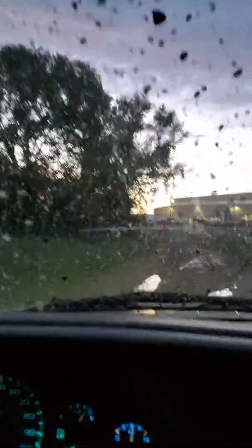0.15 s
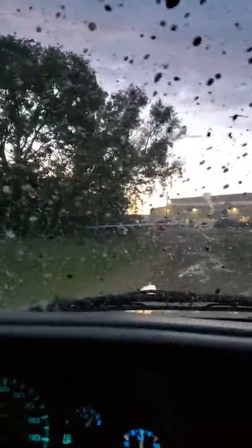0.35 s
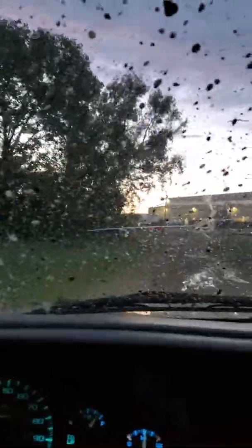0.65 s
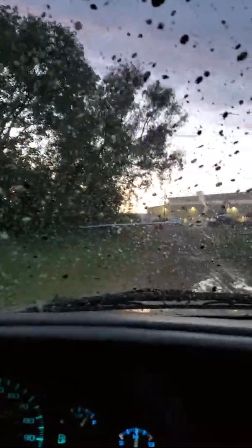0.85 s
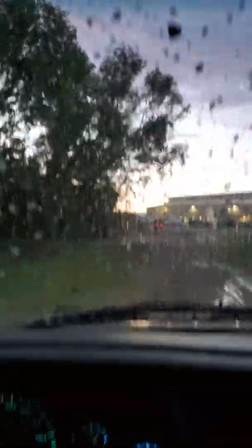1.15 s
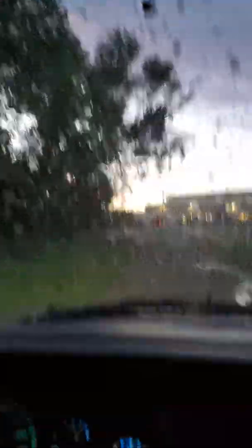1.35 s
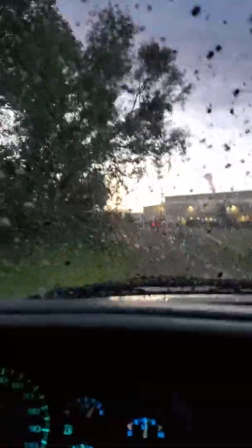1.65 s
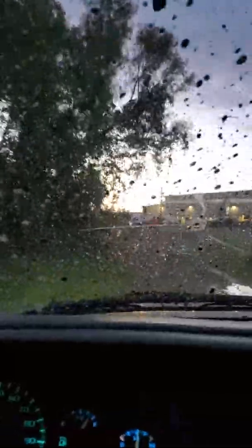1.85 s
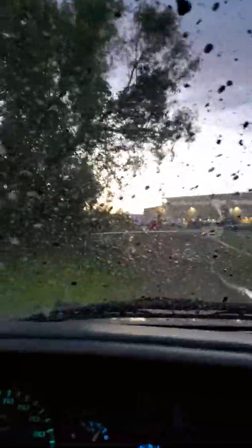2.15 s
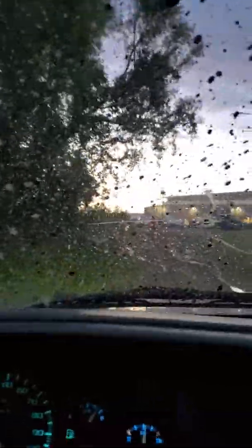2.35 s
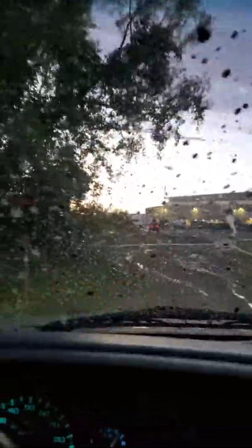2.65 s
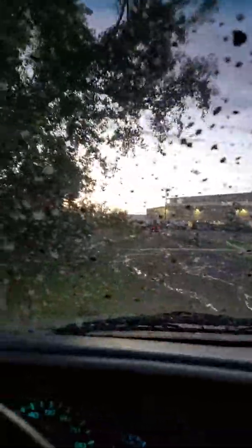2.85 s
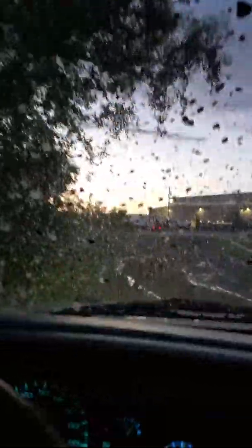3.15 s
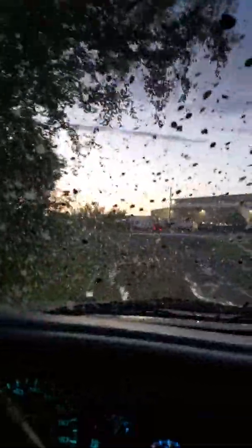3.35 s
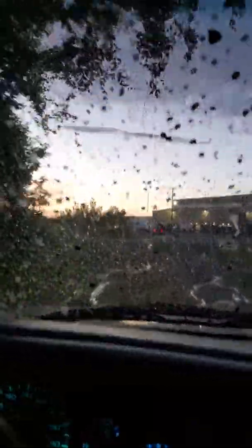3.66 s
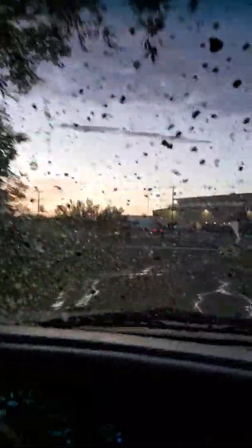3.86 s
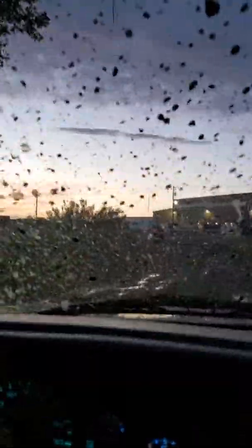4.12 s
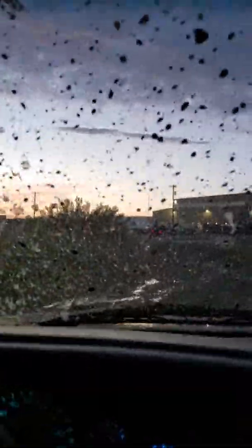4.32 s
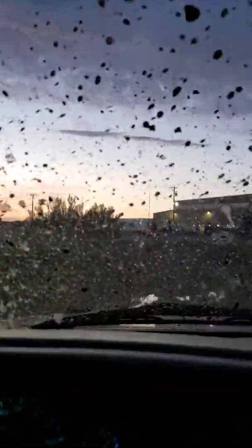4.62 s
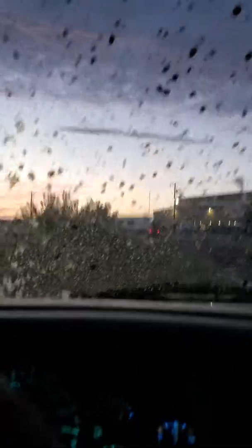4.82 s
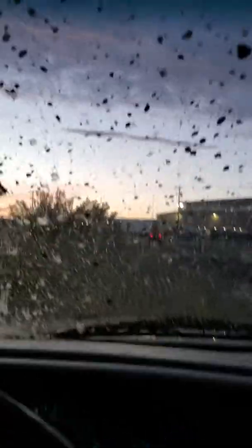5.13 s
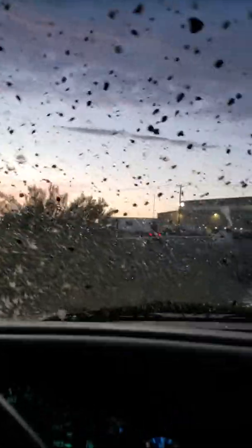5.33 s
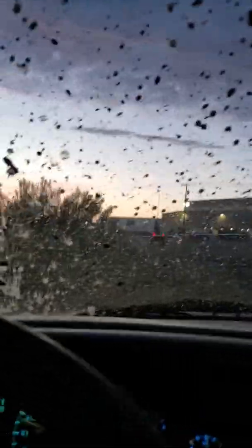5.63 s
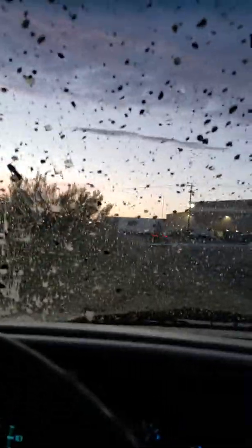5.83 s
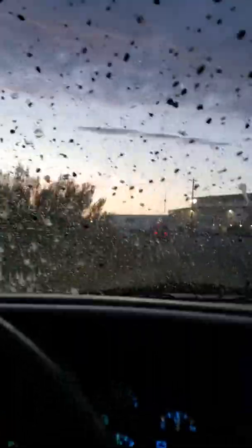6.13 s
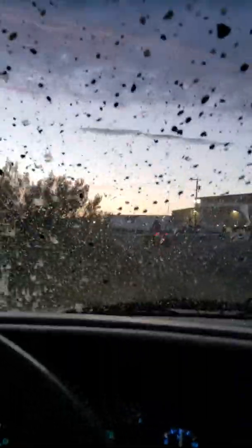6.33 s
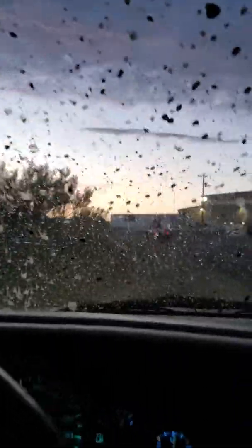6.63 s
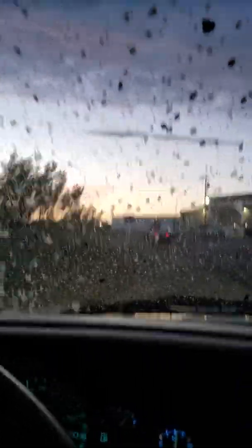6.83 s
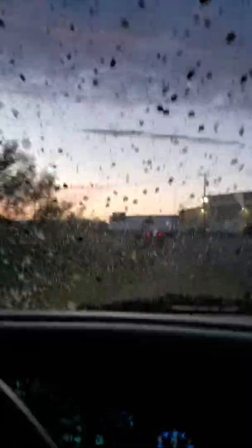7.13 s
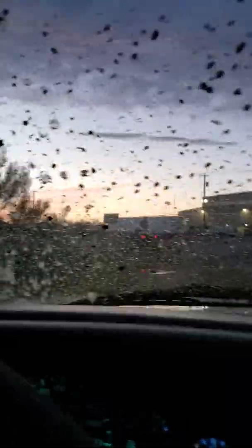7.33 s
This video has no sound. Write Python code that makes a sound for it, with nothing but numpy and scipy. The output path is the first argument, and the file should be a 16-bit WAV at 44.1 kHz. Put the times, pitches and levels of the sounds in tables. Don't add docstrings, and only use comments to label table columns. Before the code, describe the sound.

Inside a large vehicle's cab, a low engine drone sinks and fades while loose trim knocks, the body booms, and two hard jolts rattle everything late.

```python
import sys
import numpy as np
from scipy import signal
from scipy.fft import rfft, irfft, next_fast_len
from scipy.io import wavfile
from scipy.ndimage import uniform_filter1d, map_coordinates

SR = 44100
rng = np.random.default_rng(int(sys.argv[2]) if len(sys.argv) > 2 else 0)


def natural_amplitude(level_db):
    exponent = np.asarray(level_db, float) / 20
    return 10 ** exponent


def to_wav(sig):
    pcm = np.clip(np.atleast_2d(sig), -1, 1) * 32767
    pcm = np.round(pcm).astype(np.int16)
    wavfile.write(sys.argv[1], SR, pcm.T)


N = 329868

# time in seconds, firing rate in Hz, level in dB.
FIRING = [(0.0, 109.3, -15), (0.59, 108.6, -17), (1.03, 99.4, -19.5), (1.42, 87.2, -21.5),
          (1.87, 84.3, -19), (2.29, 72.45, -21), (2.6, 71.6, -21), (2.93, 71.78, -22.5), (3.3, 71.7, -19),
          (3.6, 71.7, -23), (3.9, 71.75, -19.5), (4.18, 65.86, -29.5), (4.46, 61.25, -27.5),
          (4.77, 54.04, -25), (5.02, 50.25, -27), (5.44, 51.37, -32), (5.6, 51.06, -19)]
# multiple of the firing rate, level in dB relative to it.
ENGINE_ORDERS = [(.5, -16.5), (1.37, -29.5), (2, -36)]
# time in seconds, pitch in Hz, level in dB.
DRIVELINE = [(0, 68.68, -20), (.7, 67.76, -31), (1.499, 54.53, -22), (2.2, 49.15, -37), (2.6, 43.8, -29.5),
             (2.9, 46.84, -23), (3.15, 48.4, -47), (3.4, 46.52, -23.5), (3.6, 45.72, -16.5),
             (3.78, 46.7, -30), (3.95, 48.2, -22), (4.13, 48, -24.5), (4.35, 47.95, -23.5)]
# time in seconds, pitch in Hz, level in dB.
AXLE_SHUDDER = [
    (0, 29.96, -38),
    (1, 30.34, -36.5),
    (2.5, 27.22, -44),
    (3.3, 29, -29),
    (4.2, 30.1, -52),
]


def engine():
    floor_hz, floor_width_hz, floor_lift_db = 162, 22, 18
    phase, gain = hum(FIRING, drift=0.003, flutter_db=0.8)
    firing_hz = np.gradient(phase) * SR / (2 * np.pi)
    out = -gain * np.cos(phase)
    for multiple, under_db in ENGINE_ORDERS:
        lift_db = floor_lift_db / (1 + ((multiple * firing_hz - floor_hz) / floor_width_hz) ** 2)
        unsteady_db = 1.5 * wobble(4.6)
        out = out + gain * natural_amplitude(under_db + lift_db + unsteady_db) * np.sin(multiple * phase)
    for rows in (DRIVELINE, AXLE_SHUDDER):
        phase, gain = hum(rows, drift=0.01, flutter_db=1.5)
        out = out + gain * np.sin(phase)
    return out


def hum(rows, drift, flutter_db):
    last_s, last_hz, _ = rows[-1]
    hz, db = curves(rows + [(last_s + 1.4, last_hz, -60)])
    phase = 2 * np.pi * np.cumsum(hz * (1 + drift * wobble(8))) / SR
    return phase, np.sqrt(2) * natural_amplitude(db + flutter_db * wobble(6))


# time in seconds, dB over a smooth crawl.
SHAKING = [(0.4, -0.5), (1.3, 5), (1.9, 3), (2.4, 2.5), (3.8, 0), (3.98, 4), (4.2, 10.5), (4.75, 2),
           (5.3, 2), (5.84, 10.5), (5.98, 22), (6.17, 21.5), (6.34, 13.5), (6.46, 24), (6.69, 3.5),
           (6.8, 5.5), (6.92, -2), (7.46, 0)]
# peak in seconds, lift in dB, rise in seconds, fall in seconds.
BUMPS = [(.3, -0.5, 0.89, 0.55), (1.7, -5.5, 0.43, .2), (2.91, 0, 1, .15), (3.55, 5, 1, 0.62),
         (4.09, 4.5, 0.34, 0.28), (4.5, -0.5, 0.17, 0.42), (5.19, 3, 0.079, 0.096),
         (5.59, 3.5, 0.33, 0.085), (5.8, -2, 0.0999, 0.12), (6.05, 13, 0.5, 0.16), (6.45, 13, 0.031, 0.12),
         (6.89, 3, 0.13, 0.029), (7.02, 7, 0.067, 0.22), (7.43, 12, 0.014, 0.043)]
# peak in seconds, lift in dB, rise in seconds, fall in seconds.
MUD_SLAPS = [(.25, 0.5, 0.37, 0.41), (1.44, 4, 0.12, 0.038), (1.62, 6.5, 0.11, 0.072),
             (3.83, 4, 0.086, 0.12), (4.58, -3, 0.081, 0.079), (4.65, 0.5, 0.018, 0.044),
             (4.94, 2.5, 0.39, 0.053), (5.41, 3, 0.18, 0.041), (5.71, 6, 0.19, 0.011),
             (6.47, -4, .03, 0.022), (6.9, -7, 0.056, 0.067), (7.29, 5, 0.11, 0.031), (7.42, -6, .04, 0.04)]
# frequency in Hz, density in dB per Hz.
BOOM = [(7.1, -36), (12, -21), (38, 3), (59, 6.5), (83, -0.5), (110, -7.5), (140, -35.5), (240, -120)]
# frequency in Hz, density in dB per Hz.
THRUM = [(59, -15.5), (100, 1), (151, 0), (194, -13), (230, -16), (300, -29), (510, -120)]
# frequency in Hz, density in dB per Hz.
DRUM = [(120, -21), (200, -1.5), (346, -5), (410, -4), (481, -8.5), (569, -12), (653, -10.5), (1170, -22),
        (2180, -35.5), (2500, -45), (3250, -63.5), (5500, -120)]
# frequency in Hz, density in dB per Hz.
FAR_RATTLE = [(290, -34), (500, -20.5), (641, 2), (700, -19.5), (764, -7), (1470, -6.5), (1890, -6),
              (3150, -10), (5570, -21), (8770, -25.5), (15100, -34), (15700, -30), (16400, -49)]
# frequency in Hz, density in dB per Hz.
SPIT = [(4000, -44.5), (7000, -17), (10000, -8), (13000, 2), (15500, -16), (16500, -22.5)]


def ground():
    (shake_db,) = curves(SHAKING)
    bump_db, slap_db = bumps(BUMPS), bumps(MUD_SLAPS)
    ease_db = -0.5922 * np.arange(N) / SR

    def noise():
        return rng.standard_normal((2, N))

    boom_db = -23 + 0.35 * shake_db + 0.59 * bump_db + ease_db
    boom = natural_amplitude(boom_db) * even(spread(noise(), BOOM))

    thrum_db = -31 + 0.52 * shake_db + 0.7 * bump_db + 2.04 * ease_db + 0.5 * slap_db
    thrum = natural_amplitude(thrum_db + 0.9 * wobble(13)) * even(spread(noise(), THRUM))

    drum_db = -42 + 0.57 * shake_db + 0.23 * bump_db + 0.5 * ease_db + slap_db
    drum = natural_amplitude(drum_db + 0.9 * wobble(19)) * spread(noise(), DRUM)

    rattle_db = -57.5 + shake_db
    clump_db = 1.6 * wobble(30) + 3.5 * wobble(58) + 5.0 * rng.standard_normal(N)
    contacts = natural_amplitude(clump_db) * noise()
    rattle = natural_amplitude(rattle_db + 3.0) * spread(contacts, FAR_RATTLE)
    spit = natural_amplitude(1.3 * (rattle_db + 38.0) - 56.5) * spread(contacts, SPIT)
    return boom + thrum + drum + rattle + spit


def bumps(rows):
    t = np.arange(N) / SR
    lifts = [np.interp(t, [s - rise, s, s + fall], [0, db, 0]) for s, db, rise, fall in rows]
    return np.sum(lifts, axis=0)


def even(x):
    swell = uniform_filter1d(np.abs(x).mean(axis=0), size=SR // 16)
    return unit(x / (swell + 0.15) ** 0.7)


# frequency in Hz, level in dB per Hz.
TRIM = [(290, -25), (500, 6.5), (790, 10.5), (900, 8), (1390, -2.5), (1860, -2), (2030, -3.5), (2190, -3),
        (3290, -7.5), (3810, -8.5), (5030, -12.5), (6360, -20.5), (8300, -20), (8700, -16), (10300, -15.5),
        (12000, -23), (13900, -25.5), (14400, -17.5), (15500, -20), (16400, -36.5)]
# frequency in Hz, left in dB, right in dB, t60 in seconds.
PANEL = [(899, 3, 7, .1), (998, 5, 10, .09), (1176, 5, 7, .1), (1243, 1, 9, .1), (1545, 5, 3, .08),
         (1878, 1, 10, .09), (1948, -2, 3, .07), (2172, 5, 14, .07), (2330, 3, 11, .06), (2590, 6, 6, .08),
         (2718, 8, 5, .08), (3060, 7, 10, .06), (3248, 13, 13, .07), (3400, 1, 5, .07)]
# frequency in Hz, left in dB, right in dB, t60 in seconds.
CLIP = [(4371, 0, -4, .07), (4750, 0, -2, .05), (5080, 6, 3, .05), (7714, -4, -9, .08), (9043, -6, -1, .08),
        (9950, -5, -3, .05), (11391, -12, -7, .07)]


def trim(places=6):
    chatter = np.zeros((2, places, N + SR // 25))
    lead_s = 0.0044
    for place, s, db, bright_db in knocks():
        if place == 1:
            burst, start = scuff(0.0007), round((s - lead_s / 2) * SR)
        else:
            burst, start = scuff(0.0025), round((s - lead_s) * SR)
        band_db = db + np.array([[0], [bright_db + 18.5]])
        chatter[:, place, start:][:, :len(burst)] += natural_amplitude(band_db) * burst

    hard_lift_db = np.zeros((places, 1))
    hard_lift_db[1] = 1

    def colour(hz):
        high = 1 / (1 + (6500 / (hz + 1)) ** 6)
        thin = 0.35 + 0.65 / (1 + (1500 / (hz + 1)) ** 4)
        hard = natural_amplitude(hard_lift_db * (2 / (1 + ((hz - 4400) / 2300) ** 2) - 1.5))
        return natural_amplitude(along(TRIM, hz)) * thin * hard * np.array([[1 - high], [high]])

    ring = np.zeros((2, N))
    for band, modes in zip(chatter[:, 0], (PANEL, CLIP)):
        ring += signal.oaconvolve(band[None], ringing(modes), axes=1)[:, :N]
    return natural_amplitude(23) * cab(filtered(chatter[..., :N], colour).sum(axis=0)) + ring


# time in seconds, peak in dB, brightness in
# dB.
PANEL_KNOCKS = [(0.1252, -41, -19.5), (0.147, -40, -17.5), (0.267, -57.5, -23), (0.3472, -33.5, -17),
                (0.4967, -41, -23.5), (0.5726, -39, -18), (0.69, -29, -17), (0.7236, -27.5, -16),
                (0.771, -33, -17), (0.832, -47.5, -22.5), (0.9136, -39, -23.5), (1.1387, -26, -17.5),
                (1.199, -38.5, -26.5), (1.221, -31.5, -18), (1.2718, -31, -17.5), (1.3913, -24, -19),
                (1.4372, -26, -16), (1.5563, -38.5, -26), (1.6261, -25, -17), (1.675, -26.5, -16),
                (1.7126, -36, -16), (1.7616, -27, -15.5), (1.807, -32.5, -15), (1.8493, -24, -19),
                (1.8942, -25, -20), (2.202, -41.5, -14.5), (2.2202, -36.5, -17), (2.3325, -25.5, -17),
                (2.4428, -41.5, -17), (2.4798, -25.5, -19.5), (2.512, -24, -19), (2.5587, -27, -16.5),
                (2.605, -37, -25), (2.6277, -39.5, -21), (2.736, -37, -21.5), (2.8878, -27, -20.5),
                (2.9726, -43, -16), (3.049, -49.5, -16.5), (3.0757, -36.5, -19), (3.1258, -50, -27.5),
                (3.1882, -38, -24.5), (3.2627, -26, -18), (3.3081, -49, -21.5), (3.354, -40, -15.5),
                (3.3977, -30.5, -14.5), (3.467, -39.5, -20), (3.525, -28.5, -18), (3.5975, -32.5, -14.5),
                (3.6382, -36.5, -21), (3.8304, -40, -25.5), (3.9989, -31, -15.5), (4.0249, -33, -23.5),
                (4.1126, -36, -16), (4.1595, -30.5, -24), (4.232, -36.5, -19.5), (4.3096, -41, -19),
                (4.333, -40, -7.5), (4.3929, -30.5, -17),
                (4.4528, -27.5, -15), (4.5022, -25.5, -14), (4.5332, -32.5, -20.5), (4.6019, -34, -15.5),
           (4.6409, -28.5, -14.5), (4.7306, -40, -17.5), (4.7635, -39, -24), (4.837, -46, -17),
           (5.0729, -35.5, -17.5), (5.237, -24.5, -17), (5.3455, -36.5, -21), (5.386, -46.5, -23),
           (5.4996, -33.5, -17), (5.5503, -25.5, -15.5), (5.6086, -31, -24.5), (5.6647, -21.5, -17.5),
           (5.7054, -27, -19), (5.7592, -28, -16), (5.8499, -34.5, -22), (5.8635, -23, -22),
           (5.893, -38.5, -18), (5.909, -30, -24), (5.9526, -29.5, -22), (5.9609, -20.5, -17),
           (5.9994, -26, -8), (6.028, -35, -11), (6.0576, -23.5, -17), (6.0898, -40, -25),
           (6.1315, -25.5, -8.5), (6.1587, -15.5, -19.5), (6.1992, -36.5, -28.5), (6.2295, -37, -18),
           (6.2412, -22, -18.5), (6.2906, -23, -16), (6.3413, -28.5, -20.5), (6.369, -32, -6.5),
           (6.4083, -23.5, -12.5), (6.4302, -31.5, -10.5), (6.461, -23, -18.5), (6.5083, -25.5, -19.5),
           (6.5485, -25.5, -16.5), (6.592, -29, -16), (6.6344, -37.5, -14.5), (6.6623, -38.5, -20.5),
           (6.7433, -31.5, -22.5), (6.766, -34, -20), (6.7872, -30, -16.5), (6.8102, -47.5, -20.5),
           (6.8325, -35.5, -34), (6.8631, -35, -36), (7.002, -38.5, -22), (7.0655, -31.5, -19.5),
           (7.1155, -27.5, -18), (7.1698, -35, -19), (7.21, -27.5, -17.5), (7.25, -33, -16.5),
           (7.2887, -29, -15.5),
                (0.4663, -41.5, -23), (0.8953, -45.5, -19), (1.0303, -37, -24.5), (1.3344, -42.5, -21.5),
                (1.5046, -43, -20.5), (1.6475, -30.5, -23), (1.8224, -38.5, -20.5), (1.9494, -43.5, -22),
                (3.8704, -40.5, -20), (3.925, -45, -22), (3.9814, -41, -20), (4.0538, -30.5, -24.5),
                (4.2085, -35, -23), (4.439, -36, -19), (4.589, -40, -20.5), (5.8374, -42, -20),
                (5.9378, -27.5, -21), (5.9924, -27.5, -22.5), (6.0294, -28, -19), (6.0444, -24, -22.5),
                (6.0832, -30.5, -20), (6.1474, -24, -15.5), (6.1642, -28.5, -21), (6.1837, -31.5, -22),
                (6.375, -29.5, -19.5), (6.3847, -29.5, -19), (6.439, -28, -19), (6.4744, -28, -20.5),
                (6.5086, -25, -22), (6.6094, -28, -23), (6.7012, -50, -22), (6.7138, -38.5, -22),
                (6.8184, -31.5, -25.5), (6.9324, -54, -22), (6.9607, -49, -21.5), (7.0314, -44, -20.5),
                (7.359, -45.5, -24.5), (7.458, -39.5, -25.5)]
# time in seconds, peak in dB, brightness in dB.
HARD_TAPS = [
    (0.4067, -32, -24.5),
    (0.636, -29, -26.5),
    (0.98, -35.5, -26.5),
    (1.049, -24.5, -21),
    (1.0899, -41, -14),
    (1.112, -29, -19),
    (2.796, -27.5, -20.5),
    (4.0674, -23, -19.5),
    (4.174, -25.5, -26.5),
    (6.7248, -38, 0),
]


def knocks(ticks=50):
    panel = [(0, s, db + 0.5, bright_db) for s, db, bright_db in PANEL_KNOCKS]
    hard = [(1, *tap) for tap in HARD_TAPS]
    spill = [(2 + k % 4, s, db + 2, bright_db) for k, (_, s, db, bright_db) in enumerate(panel)]

    (shake_db,) = curves(SHAKING)
    chance = rng.standard_normal((ticks, 2))
    due = np.cumsum(natural_amplitude(0.9 * shake_db))
    turn = (np.arange(ticks) + rng.uniform(size=ticks)) / (ticks + 1)
    at = np.searchsorted(due / due[-1], turn)
    tick_db = -50.5 + 0.5 * shake_db[at] + 2.5 * chance[:, 0]
    bright_db = -27.5 + 4 * chance[:, 1]
    stray = list(zip(2 + np.arange(ticks) % 4, at / SR + 0.0068, tick_db, bright_db))
    return panel + hard + spill + stray


def scuff(peak_s):
    u = np.arange(SR // 50) / SR / peak_s
    bins = rfft(u * np.exp(-u) * rng.standard_normal(len(u)))
    burst = irfft(bins / np.abs(bins) ** 0.65, len(u)) * np.minimum(u, 1) * np.exp(-u / 5)
    return burst / np.linalg.norm(burst)


def ringing(modes):
    rise_s, ring_db = 0.0012, -26.5
    t = np.arange(SR // 8) / SR
    out = np.zeros((2, len(t)))
    for k, (hz, left_db, right_db, t60) in enumerate(modes):
        gain = natural_amplitude(np.array([[left_db], [right_db]]) + ring_db - 60 * t / t60)
        sense = np.array([[np.sign(hz - 1300)], [1]])
        out += (-1) ** k * gain * sense * np.sin(2 * np.pi * hz * t)
    return (1 - np.exp(-t / rise_s)) * out


# frequency in Hz, t60 in seconds.
CAB_DECAY = [(500, 0.17), (2000, 0.17), (6000, 0.11), (15000, 0.1)]
# delay in ms, left in dB, right in dB.
EARLY_ECHOES = [(0, -30.5, -4.5), (1.6, 5, -22), (3.7, 6.5, 9), (5.8, 8, 7), (8.5, -4.5, -6),
                (10.5, -11, -25), (15, -12.5, -11), (19, -17.5, -6.5)]


def cab(places):
    count = len(places)
    hz, t, z = signal.stft(rng.standard_normal((count, 2, SR // 5)), SR, nperseg=128)
    decay = natural_amplitude(-60 * t / along(CAB_DECAY, hz)[:, None])
    tail = signal.istft(z * decay, SR, nperseg=128)[1]
    size = tail.shape[2]
    tail = tail / np.linalg.norm(tail[0, 0]) * (1 - np.exp(-np.arange(size) / (0.0016 * SR)))

    shift = rng.uniform(-1.1, 1, (len(EARLY_ECHOES), count, 2))
    for k, (ms, left_db, right_db) in enumerate(EARLY_ECHOES):
        at = np.round(np.abs(ms + 0.31 * shift[k]) * SR / 1000).astype(int)
        echo = (-1) ** k * natural_amplitude(np.array([left_db, right_db]) - 14.0)
        tail[np.arange(count)[:, None], [0, 1], at] += echo
    tail[1] *= 2.6 * natural_amplitude(-60 * np.arange(size) / SR / 0.055)

    bins = rfft(tail)
    hump = np.sqrt(uniform_filter1d(np.abs(bins) ** 2, size=round(250 * size / SR), axis=2))
    tail = irfft(bins / hump * hump.mean(axis=2, keepdims=True), size)
    return signal.oaconvolve(places[:, None], tail, axes=2).sum(axis=0)[:, :N]


# time in seconds, peak in dB.
THUDS = [(0.405, -36), (1.109, -34), (1.336, -35), (1.391, -33), (1.599, -44), (1.64, -33), (1.761, -39),
         (1.853, -33), (1.898, -30), (2.15, -41), (2.517, -39), (2.607, -35), (2.79, -43), (2.89, -44),
         (3.229, -40), (3.8, -41), (3.866, -42), (4.12, -35), (4.395, -28), (4.536, -37), (4.716, -35),
         (4.766, -31), (5.238, -38), (5.272, -37), (5.346, -39), (5.487, -31), (5.552, -42), (5.612, -29),
         (5.664, -31), (5.871, -35), (5.964, -29), (6.042, -26), (6.147, -25), (6.34, -35), (6.38, -37),
         (6.661, -38), (6.743, -33), (6.862, -41), (7.072, -39), (7.252, -32)]
# frequency in Hz, left in dB, right in dB, t60 in seconds.
PADDED = [(641, -5.5, 3.5, 0.055), (734, 1.5, 2.5, 0.1), (895, -1.5, 4.5, .06), (1026, 1.5, -0.5, 0.084),
          (1170, -2, -2.5, 0.038)]


def thuds():
    lead_s, scuff_s = 0.0044, 0.003
    blows = np.zeros(N + SR // 50)
    for s, db in THUDS:
        start = round((s - lead_s) * SR)
        blows[start:][:SR // 50] += natural_amplitude(db + 18.5) * scuff(scuff_s)
    return signal.oaconvolve(blows[None], ringing(PADDED), axes=1)[:, :N]


# start in seconds, end in seconds, start pitch in Hz, end pitch in Hz, level in dB.
GROANS = [(2.462, 2.558, 420, 413.9, -47), (3.232, 3.42, 400, 404, -48), (4.645, 4.697, 400, 401.3, -43.5),
          (4.732, 4.985, 241, 231, -42), (4.828, 4.975, 390, 392, -42), (5.186, 5.25, 396, 390.6, -42),
          (5.33, 5.416, 386, 397, -39), (5.52, 5.563, 395, 400, -40.5), (5.585, 5.656, 395, 380, -43),
          (7.035, 7.098, 410, 410, -44), (7.103, 7.334, 418, 411, -41), (7.342, 7.4, 425, 435, -40)]


def steering():
    out = np.zeros((2, N))
    waver, flutter = 1 + 0.006 * wobble(17), natural_amplitude(2.2 * wobble(21.9))
    for start, end, start_hz, end_hz, db in GROANS:
        lean_db = 3 if start_hz < 300 else -2.5
        span = slice(round(start * SR), round(end * SR))
        u = np.linspace(0, 1, span.stop - span.start, endpoint=False)
        arch_hz = 72.4 * (end - start) * np.sin(np.pi * u)
        hz = start_hz + (end_hz - start_hz) * u + arch_hz
        tone = np.sin(2 * np.pi * np.cumsum(hz * waver[span]) / SR)
        gain = natural_amplitude(db + 1.5 + np.array([[lean_db], [-lean_db]]))
        out[:, span] += gain * np.sin(np.pi * u) ** 0.42 * tone * flutter[span]
    return out


# multiple of its base pitch, level in dB.
WHINE = [(4, -87), (5, -85), (6, -88), (7, -91), (8, -88)]
# frequency in Hz, density in dB per Hz.
HISS = [(880, -36.5), (1500, -1.5), (2180, -4.5), (4570, -3.5), (5900, -31.5), (15000, -25.5),
        (15800, -24.5)]


def whine_and_hiss():
    phase = 2 * np.pi * 1858.7 * np.arange(N) / SR
    whine = sum(natural_amplitude(db + 3.5 + 1.5 * wobble(9)) * np.sin(k * phase) for k, db in WHINE)
    return whine + natural_amplitude(-64) * spread(rng.standard_normal((2, N)), HISS)


# frequency in Hz, left-right likeness from -1 to 1.
LIKENESS = [(60, 1), (150, 0.97), (380, 0.61), (950, 0.4), (2380, -0.26), (5980, -0.065), (15000, -0.11)]


def spread(pair, spectrum):
    def blend(hz):
        angle = np.arccos(np.clip(along(LIKENESS, hz), -1, 1)) / 2
        return natural_amplitude(along(spectrum, hz)) * np.array([np.cos(angle), np.sin(angle)])

    mid, side = filtered(pair, blend)
    return unit(np.array([mid + side, mid - side]))


def unit(x):
    return x / np.sqrt(np.mean(x ** 2) + 1e-20)


def along(points, hz):
    f, v = np.transpose(points)
    return np.interp(np.log(hz + 1), np.log(f + 1), v)


def curves(rows):
    s, *cols = np.transpose(rows)
    return [np.interp(np.arange(N) / SR, s, c) for c in cols]


def wobble(rate):
    s = np.arange(0, N + 64, 64) / SR
    knots = rng.standard_normal(int(N * 60 / SR) + 4)
    slow = map_coordinates(knots, [s * min(rate, 59)])
    return np.interp(np.arange(N) / SR, s, slow)


def filtered(x, response):
    m = next_fast_len(N + SR // 4)
    return irfft(rfft(x, m) * response(np.fft.rfftfreq(m, 1 / SR)), m)[..., :N]


def scene():
    return engine() + ground() + trim() + thuds() + steering() + whine_and_hiss()


def roll_off(x):
    return signal.sosfilt(signal.butter(12, 16590, fs=SR, output="sos"), x)


# frequency in Hz, left minus right in dB.
MIC_TILT = [(60, -1), (92, 0.5), (140, 1), (210, 1.5), (330, 0), (500, 1), (770, -1), (1170, -2),
            (1790, -8), (2740, -3), (4190, -1), (6410, 4.5), (9810, -2.5), (15000, 1)]


def record(dry):
    def microphones(hz):
        lag = np.exp(np.array([[-1j], [1j]]) * np.pi * np.minimum(hz, 900) * 0.00012)
        tilt = natural_amplitude(np.array([[0.5], [-0.5]]) * along(MIC_TILT, hz))
        return tilt * lag * (hz < 15830)

    mix = filtered(dry, microphones)
    return roll_off(mix)


dry = scene()
out = record(dry)
to_wav(out)
```